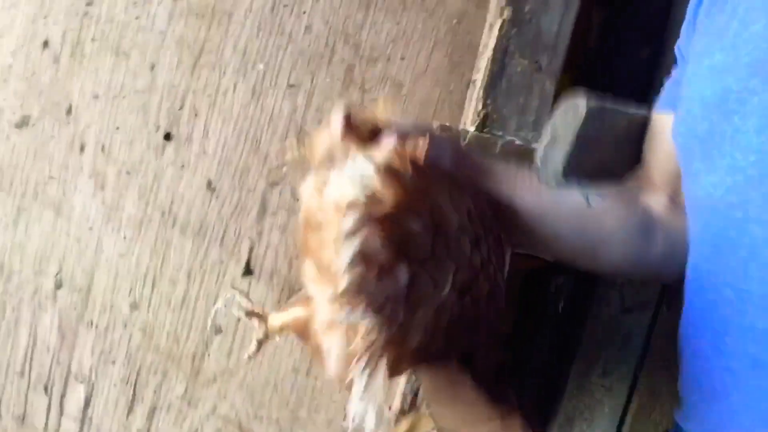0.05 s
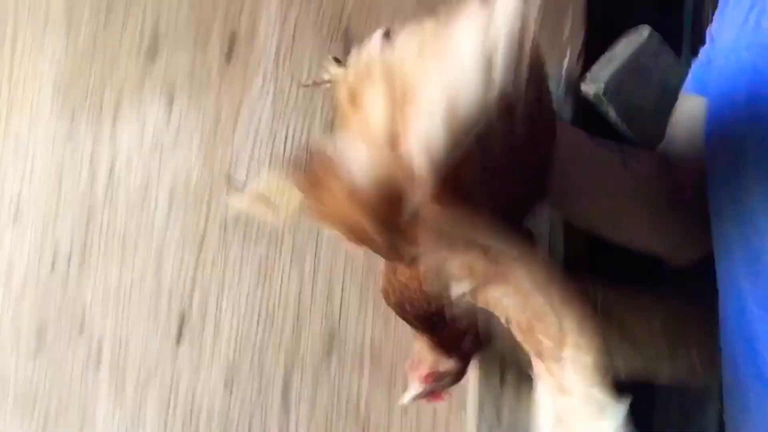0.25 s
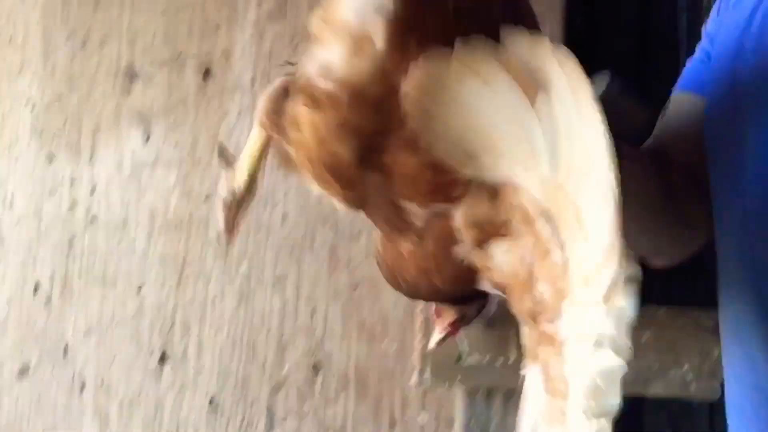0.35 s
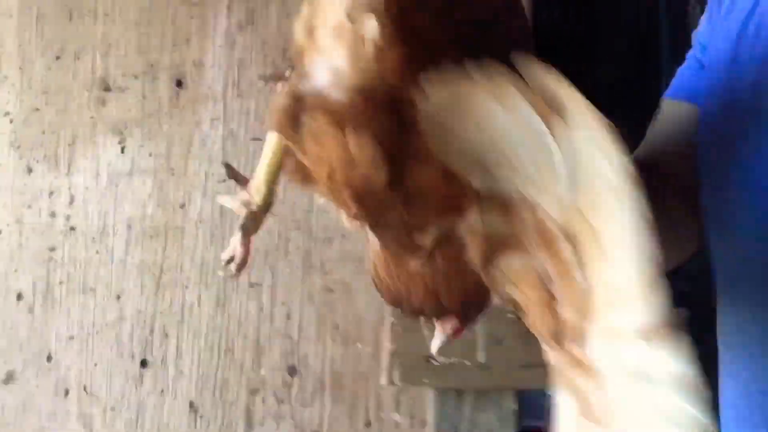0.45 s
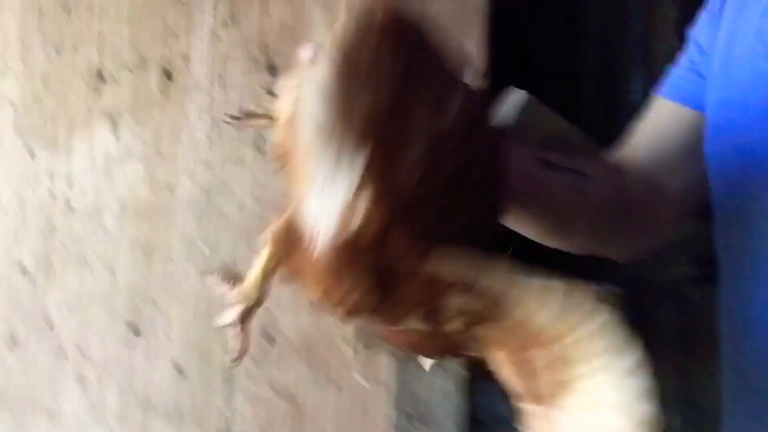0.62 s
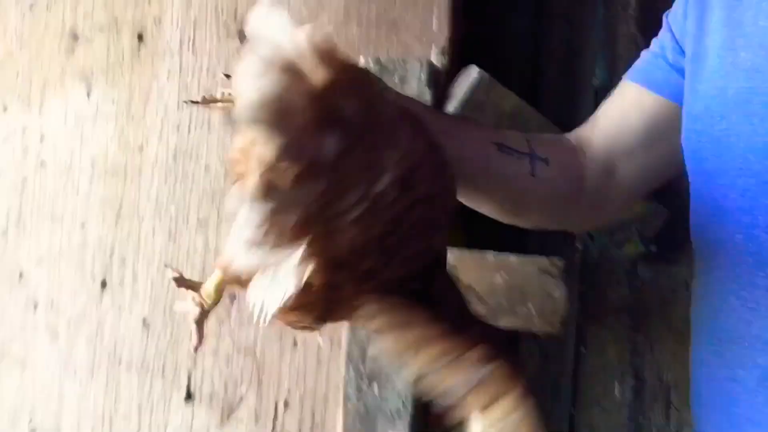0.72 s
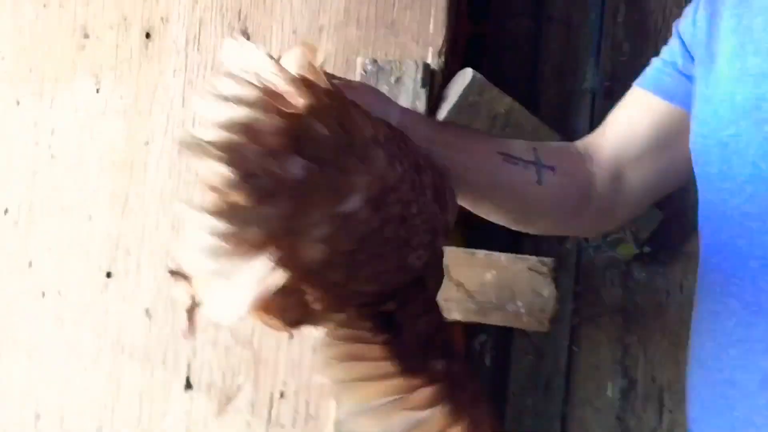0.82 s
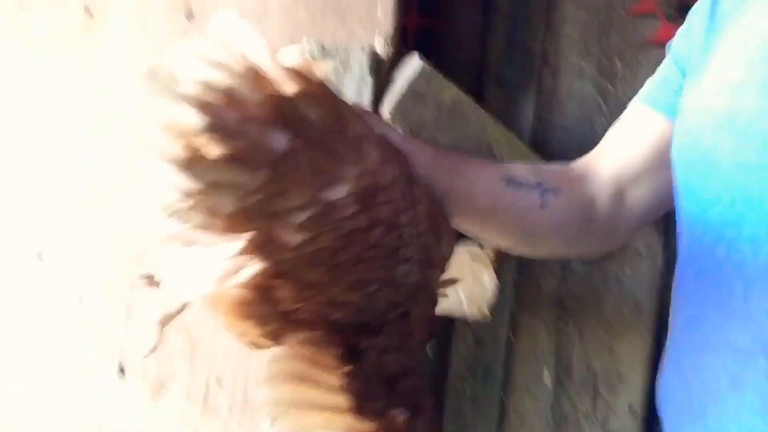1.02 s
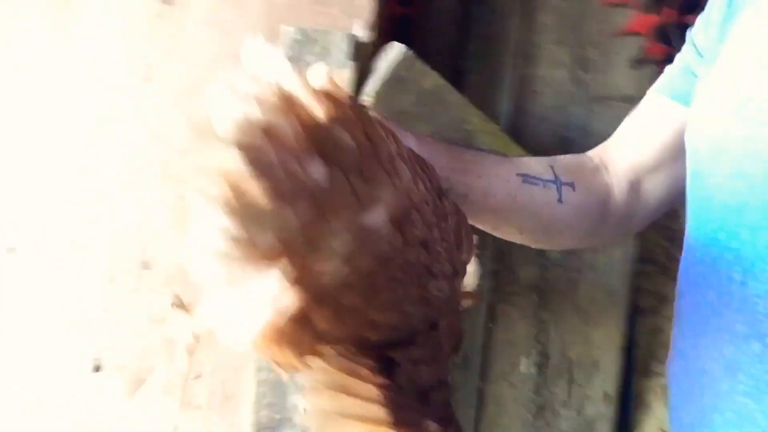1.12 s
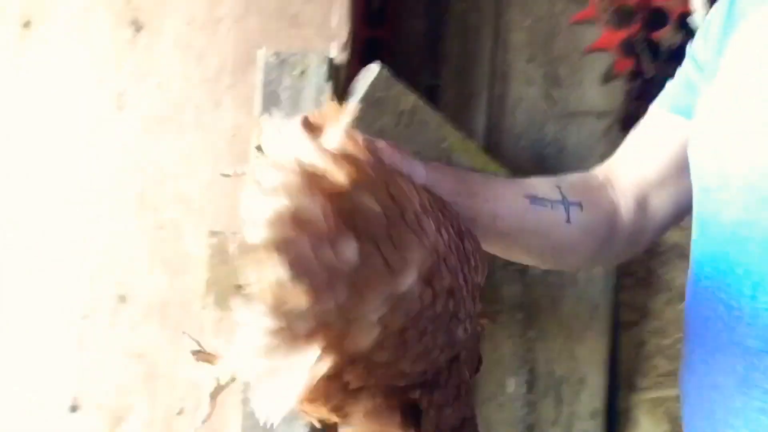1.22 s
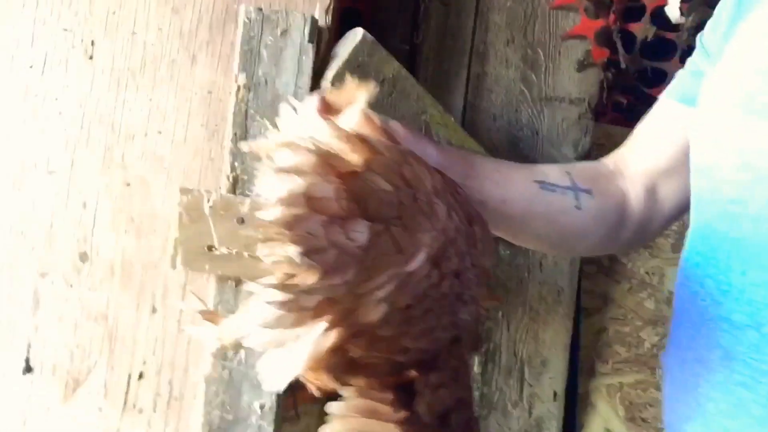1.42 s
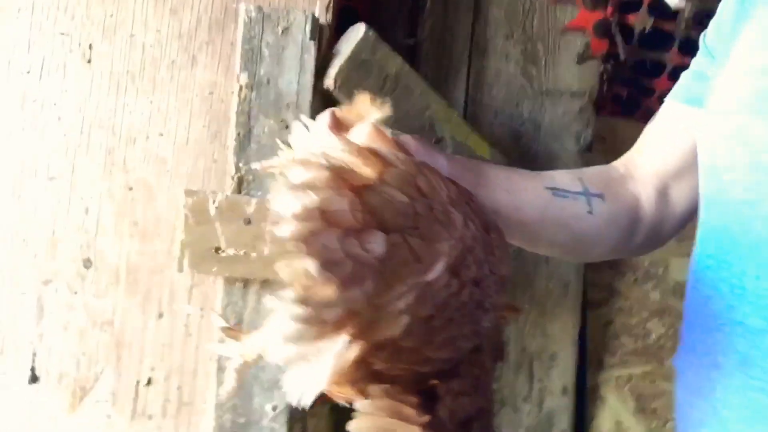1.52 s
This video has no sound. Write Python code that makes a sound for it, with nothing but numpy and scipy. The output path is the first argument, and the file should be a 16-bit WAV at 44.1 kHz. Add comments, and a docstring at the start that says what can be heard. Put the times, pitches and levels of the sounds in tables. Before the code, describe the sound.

A hen scuffles against a wooden coop, very close. Quiet air rumble and a thin short squeak at 0.1 s lead to a sudden burst of crackling wing slaps and rustle at 0.2-0.3 s, with hollow board knocks until 0.4 s. Another knock lands at 0.5 s; light scrapes and ticks fade by 1.1 s. Soft air thumps and faint distant bird chirps, densest around 1.2-1.5 s, finish over quiet barn noise.

```python
"""A hen is pushed into a wooden coop close to the microphone: wing quills slap the boards as noise bursts,
the box knocks and rings as struck modes, feathers and feet rustle on the wood as dense noisy grains.
Moved air thumps the microphone as low noise. A short squeak, a tone with its octave, precedes the loud slaps.
Small birds chirp far off in the barn as gliding whistles, over a steady noise bed and a short room tail."""
import sys
import numpy as np
from scipy import signal
from scipy.fft import rfft, irfft
from scipy.io import wavfile
from scipy.ndimage import uniform_filter1d

SR = 44100
rng = np.random.default_rng(int(sys.argv[2]) if len(sys.argv) > 2 else 0)


def pcm_store(signal):
    """Save signal as 16-bit PCM."""
    levels = np.round(np.clip(np.atleast_2d(signal), -1, 1) * 32767)
    wavfile.write(sys.argv[1], SR, levels.astype(np.int16).T)


N = 68355  # length [samples]


def amp(db):
    """Amplitude factor of a level in dB."""
    return 10 ** (np.asarray(db) / 20)


def evened(x):
    """Scales x to rms 1."""
    return x / np.sqrt(np.mean(x ** 2) + 1e-20)


def read_spectrum(points, hz):
    """Value of a frequency table, interpolated on a log-frequency axis."""
    table_hz, value = np.transpose(points)
    return np.interp(np.log(hz + 1), np.log(table_hz + 1), value)


def curve(table, index):
    """One column of a time table, interpolated at every sample."""
    rows = np.array(table)
    return np.interp(np.arange(N) / SR, rows[:, 0], rows[:, index])


def add(mix, start_s, sound):
    """Adds a sound into the mix in place, cut off at the end of the mix."""
    part = mix[max(round(start_s * SR), 0):][:len(sound)]
    part += sound[:len(part)]


def coloured(x, gain):
    """Filters x by a gain rule of frequency and scales it to rms 1."""
    hz = np.fft.rfftfreq(len(x), 1 / SR)
    return evened(irfft(rfft(x) * gain(hz), len(x)))


def resonate(x, hz, width_hz):
    """A one-pole resonance that follows the curve hz: shift down, smooth, shift back up."""
    turn = np.exp(2j * np.pi * np.cumsum(hz * np.ones(len(x))) / SR)
    pole = np.exp(-np.pi * width_hz / SR)
    smoothed = signal.lfilter([1 - pole], [1, -pole], x / turn)
    return 2 * (turn * smoothed).real


PATCH_DB = 2.6  # rms depth of the patches before the frames overlap [dB]


def patchy(x):
    """Random patches of level over time and frequency."""
    z = signal.stft(x, nperseg=256)[2]
    across_hz = uniform_filter1d(rng.standard_normal(z.shape), size=4, axis=0)
    patches = evened(uniform_filter1d(across_hz, size=14, axis=1))
    return signal.istft(z * amp(PATCH_DB * patches), nperseg=256)[1][:N]


# feathers and feet on the wood, close by: (time [s], level of the scrape [dB], treble above it [dB])
RUSTLE_LEVELS = [(0, -43.5, -36), (.03, -61, -4), (.06, -62, -9), (.15, -54.5, -10), (.158, -48, 8.5),
                 (.19, -39.5, -2), (.206, -28.5, -13), (.212, -18, -2), (.235, -23, -4.5), (.25, -24, -6),
                 (.262, -15.5, -10.5), (.285, -15.5, -2), (.3, -35, 5), (.325, -27, -22), (.345, -29, -22),
                 (.38, -38.5, -15), (.434, -46, -15), (.44, -37.5, -18), (.48, -49.5, -10),
                 (.52, -42.5, -17), (.58, -43.5, -11), (.625, -45, -14.5), (.65, -39, -18),
                 (.704, -46, -13.5), (.709, -36, -26), (.735, -38.5, -11.5), (.78, -35.5, -16.5),
                 (.82, -45, -11), (.85, -43.5, -22.5), (.87, -51, -13.5), (.92, -57, -8.5),
                 (.945, -48.5, -15.5), (1.0, -49.5, -22), (1.041, -54.5, -9), (1.055, -47.5, -12.5),
                 (1.1, -54.5, -10), (1.145, -52.5, -15), (1.17, -61, -5.5), (1.3, -61, -15),
                 (1.4, -63, -12.5), (1.55, -62.5, -5.5)]
# woody scrape before its band edges: (frequency [Hz], relative level [dB per Hz])
SCRAPE_SPECTRUM = [(88, -38), (150, -11), (198, -23), (340, -1.5), (422, -8), (602, -4), (807, -9.5),
                   (1210, -5), (2410, -12), (6000, -27.5), (7800, -61), (13200, -120)]
# treble fizz before its low cut: (frequency [Hz], relative level [dB per Hz])
FIZZ_SPECTRUM = [(2350, -1.5), (4000, -1.5), (4960, -15.5), (5570, -12), (8400, -15.5), (13300, -17.5),
                 (15000, -15.5), (16000, -28.5)]
GRAINS_PER_S, GRAIN_SPREAD_DB = 2000, 3.5  # mean rate of slips; spread of their sizes
SMOOTH_SHARE = 0.52  # weight of steady noise against single slips


def rustle():
    """Dense tiny slips of feathers and feet: a woody scrape and a treble fizz from one drive."""
    size_db = GRAIN_SPREAD_DB * np.minimum(rng.exponential(1, N), 3.5)
    size = amp(size_db) * rng.choice([-1., 1.], N)
    slips = evened(size * (rng.random(N) < GRAINS_PER_S / SR))
    drive = patchy((1 - SMOOTH_SHARE) * slips + SMOOTH_SHARE * rng.standard_normal(N))
    scrape = coloured(drive, lambda f: amp(read_spectrum(SCRAPE_SPECTRUM, f)) * (f > 120) / (1 + (f / 6000) ** 4))
    fizz = coloured(drive, lambda f: amp(read_spectrum(FIZZ_SPECTRUM, f)) / (1 + (4000 / (f + 1)) ** 4))
    treble = amp(curve(RUSTLE_LEVELS, index=2)) * fizz
    return amp(curve(RUSTLE_LEVELS, index=1)) * (scrape + treble)


# gusts of moved air at the microphone: (time [s], level [dB])
GUSTS = [(0.0, -36), (0.02, -40), (0.038, -54.5), (0.082, -39.5), (0.128, -37), (0.232, -39), (0.25, -41.5),
         (0.336, -32.5), (0.41, -47.5), (0.482, -44), (0.538, -48), (0.56, -32.5), (0.608, -40.5),
         (0.646, -50.5), (0.754, -58), (0.772, -44.5), (0.816, -48.5), (0.858, -59), (0.892, -48.5),
         (0.932, -64.5), (0.954, -52), (0.984, -60), (1.014, -50.5), (1.056, -41), (1.092, -64),
         (1.148, -45.5), (1.174, -55), (1.226, -52), (1.246, -41.5), (1.272, -32), (1.298, -48),
         (1.354, -30.5), (1.368, -47.5), (1.39, -57), (1.436, -72), (1.466, -60), (1.506, -67),
         (1.55, -69.5)]
# colour of the air thump, cut above 450 Hz: (frequency [Hz], relative level [dB per Hz])
AIR_SPECTRUM = [(12, -30), (20, -12.5), (64, 7.5), (97, 4), (272, -8.5), (350, -30), (460, -50.5),
                (770, -120)]
AIR_EVENNESS = .7  # 0 leaves the noise's own swells, 1 evens them most


def rumble():
    """Air on the microphone: low noise, its own swells partly evened out, so that it follows the gusts."""
    low = coloured(rng.standard_normal(N), lambda f: amp(read_spectrum(AIR_SPECTRUM, f)) * (f < 450))
    swell = uniform_filter1d(uniform_filter1d(low ** 2, size=900), size=900) + 0.18
    return amp(curve(GUSTS, index=1)) * low / swell ** (AIR_EVENNESS / 2)


# steady bed of the barn: (frequency [Hz], relative level [dB per Hz])
BARN_SPECTRUM = [(18, -41.5), (30, -18), (64, 1.5), (540, -22.5), (866, -22.5), (937, -18), (1350, -9),
                 (1460, -12.5), (2610, -23), (2900, 26.5), (3400, 39.5), (4910, -31.5), (16000, -23.5)]
BARN_DB = -66  # rms level


def barn_bed():
    """Steady noise in the colour of the barn."""
    return amp(BARN_DB) * coloured(rng.standard_normal(N), lambda f: amp(read_spectrum(BARN_SPECTRUM, f)))


# close by, slaps, ticks and scuffs of quills and claws; also a faint chirp-like opening at 2610 Hz
# and two faint, narrow hisses near 11.5 kHz:
# (time [s], level [dB], centre [Hz], spread [octaves], length [s])
NOISE_BURSTS = [(.001, -48.5, 2610, .12, 0.025), (.036, -47, 5430, 0.11, 0.0024),
                (0.0967, -40, 6740, 0.31, 0.0023), (0.1616, -30.5, 1930, 0.96, 0.0099),
                (0.197, -23.5, 3600, 0.46, 0.0028), (0.2087, -6, 3400, 1.05, 0.0014),
                (0.2147, -8.5, 6010, 1.1, 0.0019), (0.216, -8.5, 2450, 0.48, .003),
                (0.2255, -14.5, 3450, 0.091, .002), (0.238, -23.5, 8000, 1.1, 0.0018),
                (0.253, -7.5, 2710, .22, 0.0022), (0.26, -8, 746.6, 0.36, 0.0028),
                (0.2654, -14.5, 1401, 0.45, .003), (0.2607, -18.5, 7010, 1.2, .0026),
                (0.274, -8, 5043, 0.073, .003), (0.275, -3.5, 5660, .9, 0.0024),
                (0.2761, -9.5, 1047, 0.45, 0.0058), (0.282, -13, 10950, .6, 0.0038),
                (0.327, -11.5, 7700, 0.31, 0.0024), (0.331, -24, 10600, 0.88, 0.0066),
                (0.382, -44, 11100, 0.6, 0.0016), (.438, -35.5, 5730, 0.68, 0.0025),
                (0.442, -41, 6000, 0.59, 0.0051), (0.4896, -51.5, 10800, 0.5, 0.0096),
                (0.596, -44.5, 5520, 0.074, 0.0036), (0.709, -37, 1220, 1.15, .005),
                (0.7202, -35.5, 2300, 0.28, 0.02), (.738, -37.5, 2450, 0.33, 0.028),
                (0.935, -48.5, 1700, 0.41, 0.0093), (1.041, -41.5, 1166, 0.61, 0.0098),
                (1.062, -41, 1130, 0.28, 0.0048), (1.109, -48, 1827, .3, 0.0045),
                (1.134, -50.5, 1064, 0.4, 0.0082), (1.268, -53, 1940, 0.53, 0.02),
                (0.958, -66.5, 11350, 0.033, 0.069), (1.084, -66.5, 11600, 0.031, .065),
                (1.089, -56, 12700, 0.43, 0.0053)]
BURST_RISE_S, SCATTER_DB, SCATTER_S = 0.00056, -19, 0.0059  # rise; scatter level and decay constant


def slaps_and_hisses():
    """Bursts of band noise with a softer scatter: mostly sharp slaps and ticks, a chirp-like opening, faint hisses."""
    out, t = np.zeros(N), np.arange(4096) / SR
    noises = rng.standard_normal((len(NOISE_BURSTS), 4096))
    for (start_s, db, centre_hz, spread, length), noise in zip(NOISE_BURSTS, noises):
        band = coloured(noise, lambda f: np.exp(-.5 * (np.log2((f + 1) / centre_hz) / spread) ** 2))
        shape = np.exp(-(t / length) ** 2) + amp(SCATTER_DB) * np.exp(-t / SCATTER_S)
        envelope = np.minimum(t / BURST_RISE_S, 1) * shape
        burst = envelope * band
        # the energy is that of the envelope, whatever noise was drawn
        add(out, start_s, amp(db) * burst * np.linalg.norm(envelope) / np.linalg.norm(burst))
    return out


# small birds far off in the barn: (time [s], length [s], level [dB], start [Hz], end [Hz])
FAR_CHIRPS = [(.001, 0.011, -63, 3400, 3400), (0.031, 0.013, -50, 2640, 2600),
              (0.039, 0.012, -62, 3350, 3450), (0.456, 0.0285, -58, 4210, 3890),
              (0.567, 0.016, -51, 4040, 4000), (.93, .02, -56, 3185, 3200),
              (0.985, 0.013, -53.5, 3270, 3090), (1.036, 0.018, -50, 3184, 3560),
              (1.206, 0.012, -56.5, 3108, 3230), (1.228, 0.02, -55, 3260, 2950),
              (1.272, 0.026, -63, 3953, 3950), (1.274, 0.028, -58, 3435, 3380),
              (1.288, 0.028, -51.5, 3045, 2974), (1.293, 0.041, -57, 3407, 3440),
              (1.303, 0.05, -49.5, 3300, 2900), (1.343, 0.032, -52.5, 3103, 3070),
              (1.358, 0.049, -54.5, 2695, 2660), (1.411, .015, -58.5, 3070, 3000),
              (1.438, 0.015, -55.5, 3460, 3330), (1.488, .015, -64, 4520, 4500),
              (1.464, 0.045, -62, 2958, 2976), (1.504, 0.0217, -55, 3440, 2770),
              (1.517, 0.043, -61.5, 2923, 3026)]
CHIRP_BLUR_HZ, CHIRP_BLUR_SHARE = 240, .85  # width of the blur; its weight beside the tone


def chirps():
    """Short gliding whistles, blurred by distance with narrow noise around the pitch."""
    out = np.zeros(N)
    noises = rng.standard_normal((len(FAR_CHIRPS), 4000))
    for (start_s, length, db, from_hz, to_hz), noise in zip(FAR_CHIRPS, noises):
        progress = np.arange(0, length, 1 / SR) / length
        hz = from_hz + (to_hz - from_hz) * progress
        whistle = np.sin(2 * np.pi * np.cumsum(hz) / SR)
        blur = evened(resonate(noise[:len(progress)], hz, CHIRP_BLUR_HZ))
        add(out, start_s, amp(db) * np.sin(np.pi * progress) * (whistle + CHIRP_BLUR_SHARE * blur))
    return out


# the short squeak: (time [s], pitch [Hz], level [dB], level of the octave [dB])
SQUEAK_TRACK = [(0.075, 1455, -67, -96.5), (0.101, 1446, -44.5, -50.5), (0.119, 1430, -35.5, -56.5),
                (0.129, 1455, -49, -70.5), (0.139, 1410, -43.5, -74.5), (0.15, 1343, -65.5, -65)]


def squeak():
    """A thin tone with its octave, both on one phase."""
    t = np.arange(N) / SR
    phase = 2 * np.pi * np.cumsum(curve(SQUEAK_TRACK, index=1)) / SR
    tone = amp(curve(SQUEAK_TRACK, index=2)) * np.sin(phase)
    octave = amp(curve(SQUEAK_TRACK, index=3)) * np.sin(2 * phase)
    sounding = (t > SQUEAK_TRACK[0][0]) * (t < SQUEAK_TRACK[-1][0])
    return np.sqrt(2) * (tone + octave) * sounding  # root 2 makes the levels rms


# blows on the box, close by: (time [s], level before the low cut [dB], contact [s])
BOX_BLOWS = [(0.199, -30.5, 0.00059), (0.2092, -22, 0.00018), (0.2587, -19, .0009), (0.265, -21.5, 0.00049),
             (.279, -12.5, 0.0017), (0.328, -9, 0.00086), (0.335, -12.5, 0.002), (0.344, -10, 0.0024),
             (0.361, -20, 0.0013), (.376, -26.5, 0.0013), (0.391, -33, 0.0015), (0.297, -14.5, 0.0014),
             (0.313, -21, 0.0017), (0.502, -28.5, 0.00093), (0.5061, -15, 0.0032), (0.534, -35, 0.0013),
             (0.565, -42.5, 0.00072), (0.774, -41.5, 0.00068), (1.046, -47, 0.00066),
             (1.274, -42.5, 0.00098)]
# what the box rings with, before spot and damping: (frequency [Hz], relative level [dB], t60 [s])
BOX_MODES = [(178, -7.5, .1), (207.2, -5, 0.045), (227, 1.5, 0.092), (286.4, -6.5, 0.097), (309, 0, 0.048),
             (422.4, -10.5, 0.17), (464, -10, 0.11), (590, 0.5, 0.029), (810, -17, 0.0063),
             (910, -8.5, 0.043), (990, -20.5, 0.0091), (1232, 9, 0.022), (1740, -21, 0.019),
             (2290, -12.5, 0.01986)]
STRIKE_SPOT_DB, STRIKE_SPOT_PITCH = 1.5, .015  # modes vary with the spot hit [dB, fraction], one sigma
LONGEST_RING_S = .125  # ceiling on t60: the hen's body damps the boards


def knocks():
    """A half-sine push rings the modes of the box; a longer contact sounds duller."""
    out, t = np.zeros(N), np.arange(10000) / SR
    spots = rng.standard_normal((len(BOX_BLOWS), len(BOX_MODES), 2))
    for (start_s, db, contact), spot in zip(BOX_BLOWS, spots):
        ring = np.zeros(len(t))
        for k, ((hz, mode_db, t60), (level_shift, pitch_shift)) in enumerate(zip(BOX_MODES, spot)):
            decay_db = 60 * t / min(t60, LONGEST_RING_S)
            level = amp(mode_db + STRIKE_SPOT_DB * level_shift - decay_db)
            mode_hz = hz * (1 + STRIKE_SPOT_PITCH * pitch_shift)
            ring += (-1) ** k * level * np.sin(2 * np.pi * mode_hz * t)  # modes alternate in sign
        push = np.sin(np.pi * np.clip(t[:400] / contact, 0, 1))
        add(out, start_s, amp(db) * signal.oaconvolve(ring, push / push.sum()))
    # low cut around 110 Hz, keeping the overall rms
    return coloured(out, lambda f: f ** 2 / (f ** 2 + 110 ** 2)) * np.sqrt(np.mean(out ** 2))


# how long the reflections last: (frequency [Hz], t60 [s])
ROOM_DECAY = [(200, .12), (1000, .2), (4000, .25), (12000, .22)]


def room(x):
    """Sparse reflections, each band dying at its own speed; the tail has unit energy."""
    taps = np.zeros(SR // 2)
    at = np.arange(120, len(taps) - 20, 20)
    taps[at + rng.integers(0, 20, len(at))] = rng.choice([-1., 1.], len(at))
    hz, t, z = signal.stft(taps, SR, nperseg=256)
    decay = amp(-60 * t / read_spectrum(ROOM_DECAY, hz)[:, None])
    tail = signal.istft(z * decay, SR, nperseg=256)[1]
    return signal.fftconvolve(x, tail / np.linalg.norm(tail))[:N]


ROOM_DB, CHIRP_ROOM_DB = -15, -7.5  # send into the room: close sounds, far birds


def scene():
    """The coop close by, birds far off, both with room; moved air and the barn bed stay without it."""
    near = slaps_and_hisses() + knocks() + rustle() + squeak()
    far = chirps()
    reflected = room(amp(ROOM_DB) * near + amp(CHIRP_ROOM_DB) * far)
    return (near + far + reflected + rumble() + barn_bed())[None]


MIC_DROOP_HZ, CLIP_LEVEL, EDGE_HZ = 14400, 1.0, 16050  # -3 dB point, full scale, upper band edge


def record(dry):
    """The microphone droops at the top, its input clips whatever exceeds full scale, then the band limit."""
    hz = np.fft.rfftfreq(N, 1 / SR)
    droop = irfft(rfft(dry) / np.sqrt(1 + (hz / MIC_DROOP_HZ) ** 4), N)
    clipped = np.clip(droop, -CLIP_LEVEL, CLIP_LEVEL)
    band_limit = signal.firwin(511, EDGE_HZ, window=("kaiser", 9), fs=SR)
    return signal.oaconvolve(clipped, band_limit[None], "same")


dry = scene()
out = record(dry)
pcm_store(out)
```